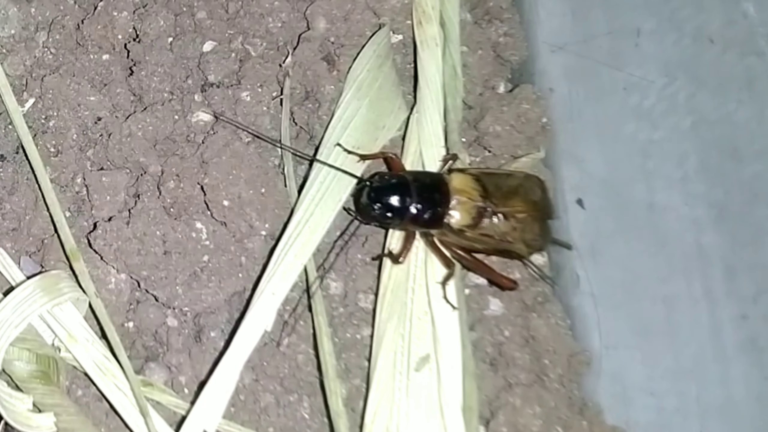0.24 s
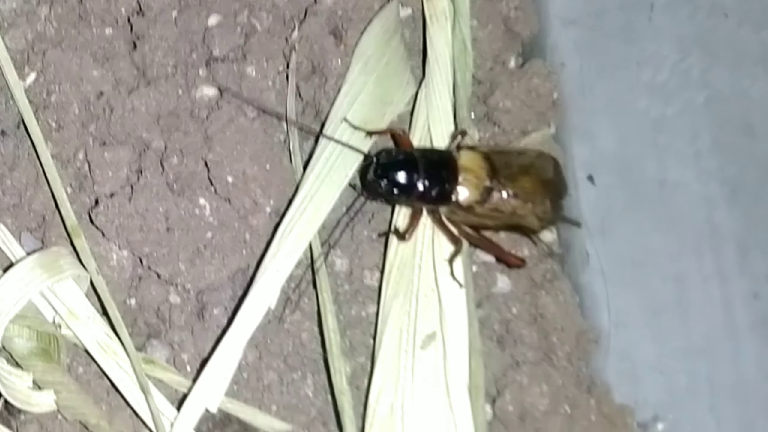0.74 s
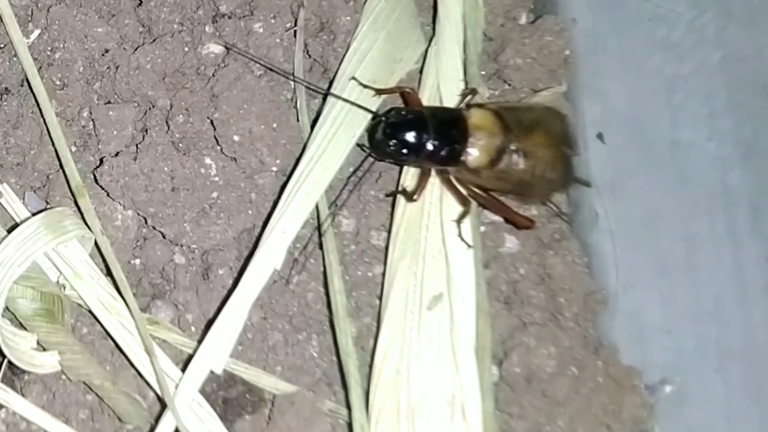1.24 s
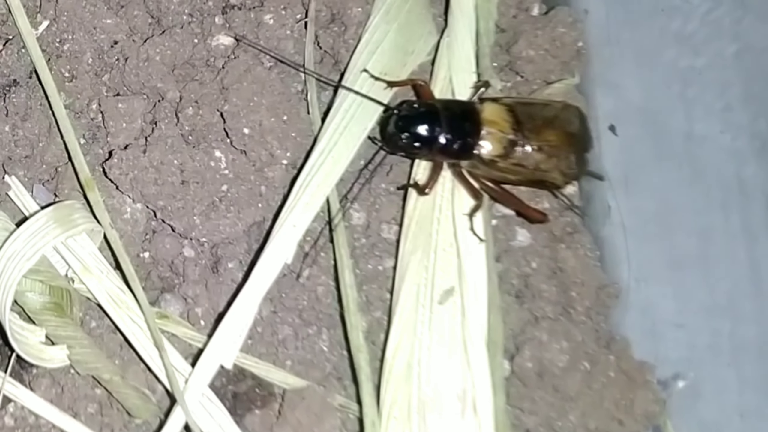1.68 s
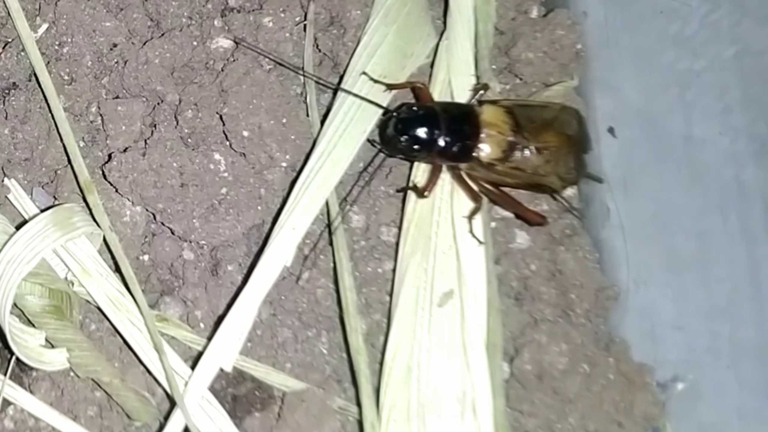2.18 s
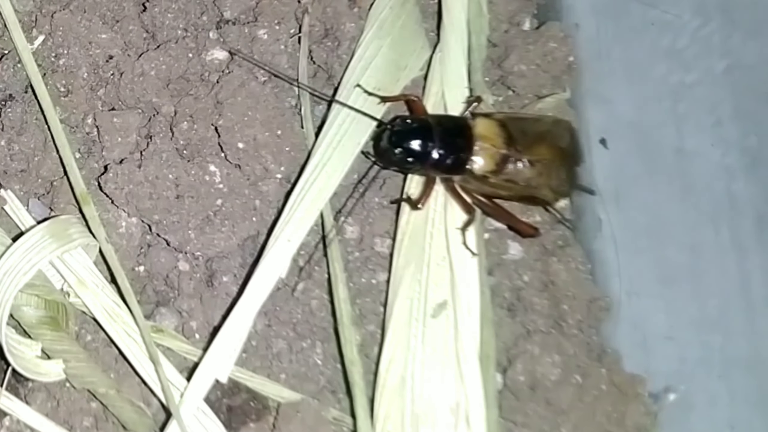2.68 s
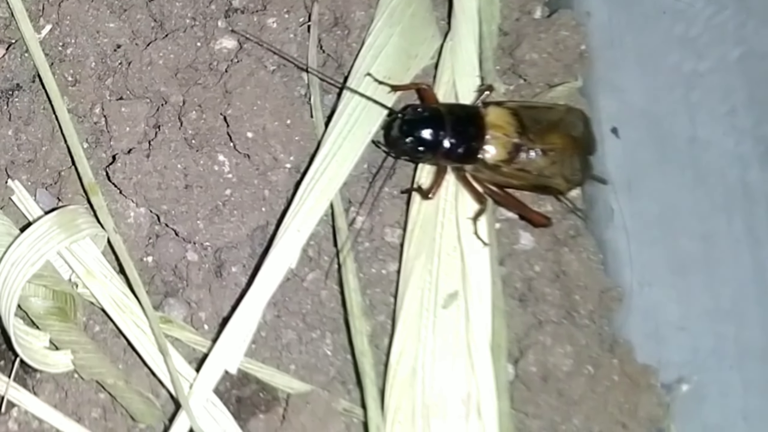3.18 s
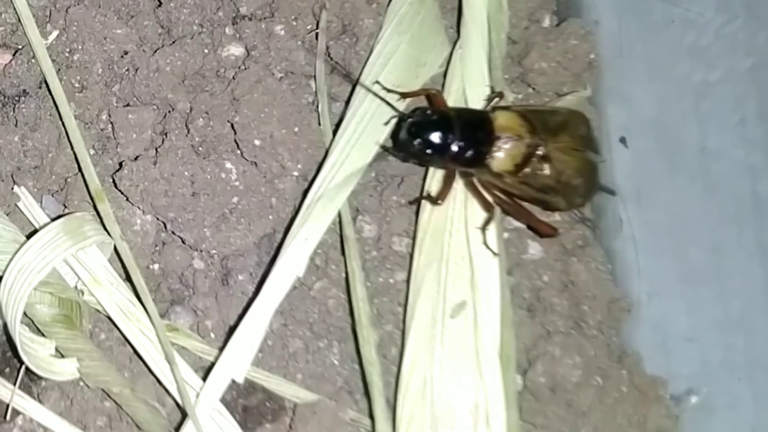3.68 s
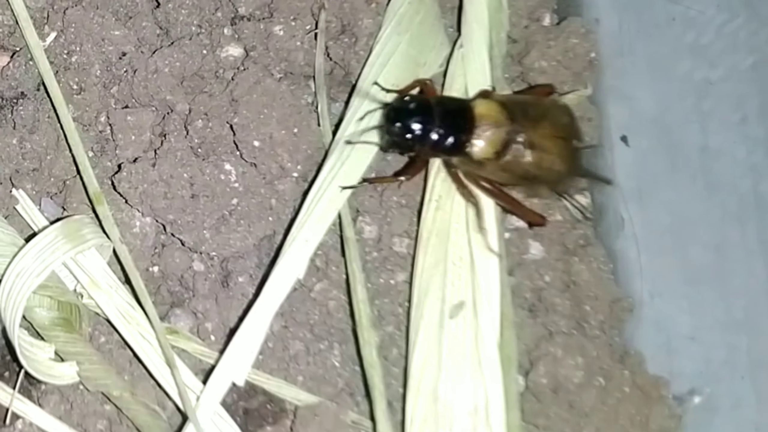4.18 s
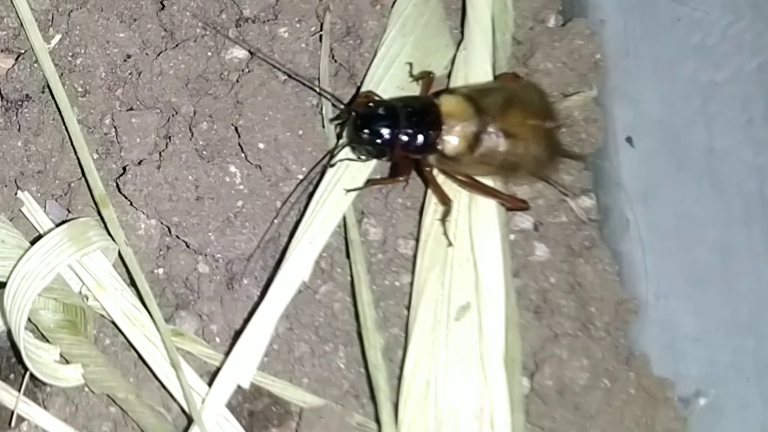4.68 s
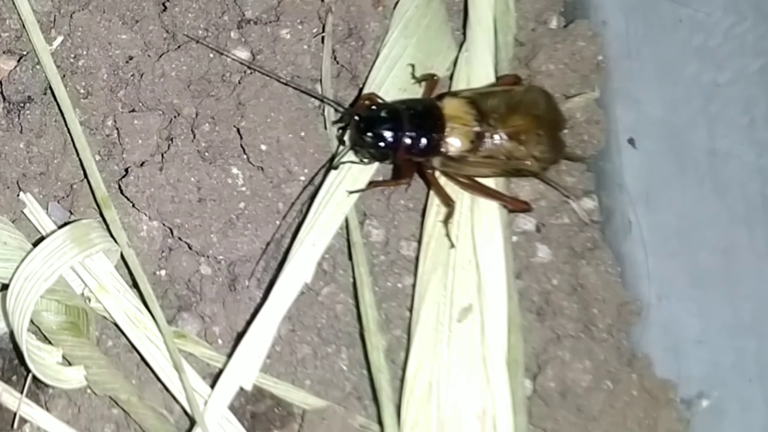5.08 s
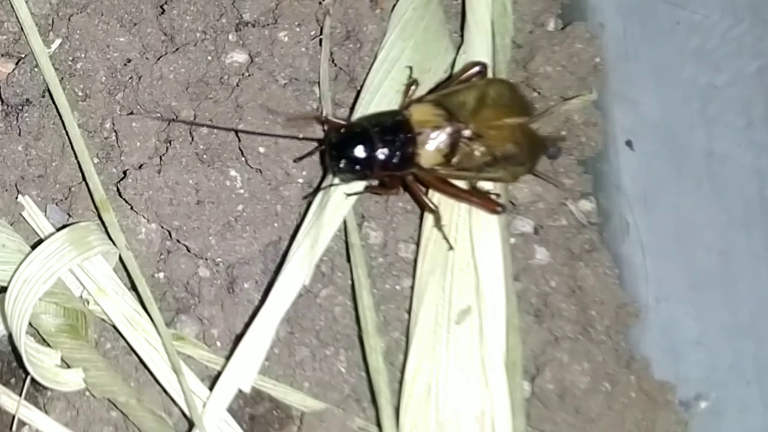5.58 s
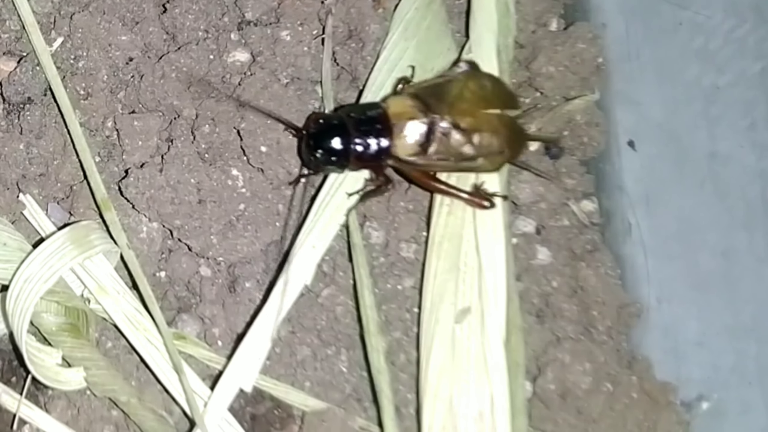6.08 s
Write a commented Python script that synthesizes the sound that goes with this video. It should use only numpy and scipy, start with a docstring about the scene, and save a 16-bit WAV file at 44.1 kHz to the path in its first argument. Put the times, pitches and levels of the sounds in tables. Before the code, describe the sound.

Outdoors at night by a wall, a phone very close to a cricket. At 0 s the ring of an earlier chirp fades, with a barely audible far-off hoot, perhaps a dog, at 0.06-0.25 s. A weaker two-pulse chirp at 0.12 s leads to loud shrill chirps at 0.36, 0.63, 0.98 and 1.31 s. Each is normally three 20 ms pulses, 30 ms apart, near 5.2 kHz and falling about 500 Hz, with overtones, rasp and a short outdoor echo. After a pause, chirping resumes at 2.0 s, every 0.2-0.35 s until the end; 4.23 s is a broken, squeaky pair, and 5.97 s has four pulses. Gritty scrapes and tiny skids fill gaps, with faint dull knocks near 0.74, 3.97 and 6.05 s and very faint hoarse distant calls at 0.6 and 4.6 s. The cricket moves left to right after 4 s. Soft low rumble, wavering hum and thin hiss persist.

```python
"""At night on bare soil by a wall, the echo of an earlier chirp fades under a faint, far-off hoot, perhaps a dog's bark.
A field cricket a hand's width from a phone then chirps to the end: each wing stroke drags a scraper over a file,
whose tooth strikes sound a falling 5 kHz tone with overtones and rasp, about three strokes a chirp, each echoed.
Between come gritty wing scrapes, squeaking skids, dull resonant knocks and a few hoarse far calls, mostly echo.
Late on, the cricket's image passes from left to right; filtered-noise rumble and air and a wavering hum last throughout."""
import sys
import numpy as np
from scipy import signal
from scipy.fft import rfft, irfft
from scipy.io import wavfile
from scipy.ndimage import map_coordinates

SR = 44100
rng = np.random.default_rng(int(sys.argv[2]) if len(sys.argv) > 2 else 0)


def log_audio(samples):
    """Write samples as a 16-bit WAV file to the path given in sys.argv[1]."""
    # one column per channel
    frames = np.atleast_2d(samples).T
    # limit to full scale, then quantise
    limited = np.clip(frames, -1, 1)
    pcm = np.round(limited * 32767).astype(np.int16)
    wavfile.write(sys.argv[1], SR, pcm)


N = 279594
TIME = np.arange(N) / SR
FREQ = np.maximum(np.fft.rfftfreq(N, 1 / SR), 1)

# Nominal chirps, before each stroke's own changes: (middle of first stroke [s], strokes [count],
# stroke period [s], stroke length [s], pitch fall [Hz], level [dB], rasp re level [dB],
# slip of first stroke [0-1], share lost from last stroke [0-1], opening scrape, relative level [dB])
CHIRPS = [(0.1211, 2, 0.031, 0.025, 540, -19, -18.5, 0.98, 0.13, -48),
          (.361, 3, 0.03, .021, 530, -17.3, -22.5, .6, 0.02, -59),
          (0.634, 3, 0.03, .018, 530, -17, -20, 0.01, 0.69, -68),
          (0.979, 3, 0.03, .02, 510, -16.5, -24.5, 0, 0.01, -42.5),
          (1.3078, 3, 0.031, .02, 486, -16.5, -25.5, 0.09, 0.41, -40),
          (2.0035, 3, 0.031, .018, 554, -17, -21, 0.63, 0.03, -46),
          (2.324, 3, 0.031, .017, 540, -16, -27, 0, 0.03, -40),
          (2.641, 3, 0.031, .019, 463, -16.2, -24.5, 0.1, 0.02, -44),
          (2.911, 3, 0.03, .0195, 500, -16.5, -22.5, 0.06, 0.02, -43),
          (3.287, 3, .03, .0185, 490, -16.5, -25, 0.03, 0.01, -41.5),
          (3.54, 3, 0.03, .018, 460, -16, -23.5, 0, 0.01, -42.5),
          (3.745, 3, 0.029, .0175, 504, -16.5, -21.5, 0.03, 0.01, -56),
          (4.019, 3, 0.029, .018, 510, -16, -21.5, 0.11, 0, -57),
          (4.225, 2, 0.03, 0.016, 348, -16.5, -19.5, 1, 0, -64),
          (4.4454, 3, 0.028, .018, 535, -16, -23, 0.98, 0, -46.5),
          (4.709, 3, 0.03, .0205, 474, -16.5, -24.5, 0, 0, -42),
          (4.9586, 3, 0.031, .02, 520, -16, -26, 0, 0.02, -41),
          (5.2139, 3, 0.03, .0205, 520, -15.9, -24, 0.01, 0.31, -40),
          (5.418, 3, 0.029, .017, 590, -15.5, -24, 0.03, 0, -55),
          (5.661, 3, 0.029, .018, 525, -15.5, -30.5, 0, .45, -54),
          (5.9712, 4, 0.03, .016, 563, -15, -21.5, 0.07, 0.13, -49)]
# Colour of the rasp: (frequency [Hz], relative level [dB])
RASP_COLOUR = [(1000, -28.5), (3600, -28), (4500, 4.5), (5600, 7), (6700, -4), (7400, -16), (8100, -14),
               (9200, -10.5), (10300, 8), (12200, -2.5), (13800, -1.5), (15300, -13), (16200, 10)]
# Skids and squeaks of the scraper: (time [s], length [s], centre [Hz], width [Hz], level [dB])
SKIDS = [(0.688, 0.007, 11200, 2400, -28), (4.225, 0.0046, 11200, 2500, -30),
         (4.277, 0.007, 11350, 1400, -27.5), (5.711, 0.0071, 11170, 2500, -29.5),
         (6.233, 0.0023, 12400, 4000, -37), (6.235, 0.0038, 14900, 2000, -30.5)]
# Light scrapes as the wings shift between chirps: (time [s], relative level [dB])
SHIFT_SCRAPES = [(0.315, -46.5), (0.604, -43.5), (0.832, -41.5), (1.874, -41), (1.911, -51.5), (1.939, -49),
                 (3.979, -48.5), (4.347, -44.5), (5.316, -42), (5.538, -46), (5.628, -38.5), (5.927, -41),
                 (6.113, -42), (6.208, -43), (6.292, -45)]
# Colour of a slack wing lightly scraped: (frequency [Hz], relative level [dB])
SLACK_WING_COLOUR = [(1200, -40), (2400, -15.5), (3700, -15.5), (4200, -11), (4600, 8.5), (5100, 0),
                     (6600, -19), (7800, -30), (10000, -45)]
# Place of the cricket between the microphones: (time [s], left minus right [dB])
CRICKET_PAN = [(0, 3.2), (3.7, 3.3), (4.7, 1.5), (5.3, .4), (5.7, -2.5), (6.3, -3.5)]
# Nearby surfaces as each microphone hears them: (delay [ms], level re direct sound [dB])
NEAR_LEFT = [(1.949, -13), (4.45, -6)]
NEAR_RIGHT = [(2.62, -21.5), (4.904, -15)]
# A faint, far-off hoot, perhaps a dog's bark, one row: (time [s], length [s], relative level [dB])
FAR_HOOT = (0.058, 0.19, -59.5)
# Soft knocks near the phone: (time [s], relative level [dB])
KNOCKS = [(0.741, -40), (3.973, -41.5), (6.050, -46)]
# Brief far-off calls: (time [s], length [s], pitch [Hz], relative level [dB])
FAR_CALLS = [(.585, 0.032, 1346, -66), (4.611, 0.08, 1533, -69)]
# Colour of the night rumble: (frequency [Hz], relative level [dB])
RUMBLE_COLOUR = [(20, -54.5), (31, -16.5), (42, -3), (75, 1), (170, 0.5), (225, -11.5), (310, -11.5),
                 (420, -24.5), (760, -27), (1400, -32), (2200, -31), (3300, -34), (4500, -39),
                 (7000, -94.5)]
# Stereo width of the rumble: (frequency [Hz], side minus mid [dB])
RUMBLE_SIDE = [(40, -14), (70, -13), (130, -15), (260, -12), (500, -4), (1000, 0), (16000, 1)]
# Hum partials, before they waver: (frequency [Hz], level [dB])
HUM = [(71, -57), (197, -59), (300, -69)]
# Colour of the air's thin hiss: (frequency [Hz], relative level [dB])
AIR_COLOUR = [(1000, -19.0), (3500, -3.0), (5000, 6.5), (7500, -11.0), (11000, 6), (15500, -22.0)]
# Swell and ebb of the background: (time [s], level change [dB])
NIGHT_LEVEL = [(0, -0.5), (.7, -1), (1.7, 0.7), (2.7, -2.5), (3.7, -2), (5.2, -3), (6.3, 0)]

STROKE_HZ = 5167.3  # nominal tooth rate at mid-stroke
SLOWING_S = 0.00066  # each stroke period is this much longer than the one before
SETTLE_STROKES = 0.91  # the wings settle into their stroke over about this many strokes
OPENING_LEAD_S = 0.01262  # the wings scrape open this long before a chirp
TURN_OVERTONE_DB = 0.26  # overtones gained per dB of pan as the cricket turns its wings to the right
TOP_HZ = 16000  # upper limit of the phone


def undb(db):
    """Convert a level in decibels to an amplitude ratio."""
    return 10 ** (np.asarray(db) / 20)


def unit(x):
    """Normalize to a root-mean-square value of 1."""
    return x / np.sqrt(np.mean(x ** 2))


def gains(points):
    """Frequency response: (Hz, dB) points interpolated in log frequency."""
    hz, db = np.transpose(points)
    return undb(np.interp(np.log(FREQ), np.log(hz), db))


def noise(gain):
    """Spectral filtering: white noise given a frequency response, at rms 1."""
    return unit(irfft(rfft(rng.standard_normal(N)) * gain, N))


def shaped(x, gain):
    """Power-preserving filtering: colour a white excitation by a normalized response."""
    return irfft(rfft(x) * unit(gain), N)


def resonance(hz, width_hz):
    """Resonance: a steep response peak about a natural frequency."""
    return 1 / (1 + ((FREQ ** 2 - hz ** 2) / (FREQ * width_hz * 2)) ** 2 * 2)


def walk(rate):
    """Band-limited fluctuation: smooth random motion of spread 1, up to about rate in Hz."""
    return noise(np.exp(-(FREQ / rate) ** 2))


def add(track, start, sound):
    """Superposition: mix a sound into a track at a time."""
    i = int(start * SR)
    track[i:i + len(sound)] += sound[:max(N - i, 0)]


def swell(start, length, rise, fall):
    """Rounded envelope, rms 1 over its span; rise and fall are shares of its length."""
    u = np.linspace(0, 1, int(length * SR))
    onset = np.sin(np.pi / 2 * np.minimum(u / rise, 1))
    release = np.sin(np.pi / 2 * np.minimum((1 - u) / fall, 1)) ** 2
    out = np.zeros(N)
    add(out, start, unit(onset * release))
    return out


def burst(start, decay, attack=0.00038):
    """Transient envelope: quick rise and exponential fall, time constants in s."""
    t = np.arange(SR // 10) / SR
    out = np.zeros(N)
    add(out, start, (1 - np.exp(-t / attack)) * np.exp(-t / decay))
    return out


def wing_strokes(first_shorter=0.16, first_steeper=0.37, first_db=-1.0, octave_db=-17.5,
                 first_octave_db=5.5, first_rasp_db=5.0, slip_shorter=0.23, slip_hz=130,
                 slip_db=-9.0, slip_rasp_db=9., cut_hz=260, cut_db=-3., cut_octave_db=14.,
                 cut_rasp_db=15.5, catch_rise=0.0288, first_rise=0.285):
    """Stroke kinematics: the wings settle through a chirp, and a slip or early break alters pitch and loss.

    Rows: (start s, length s, pitch Hz, fall Hz, level dB, octave dB, rasp dB, rasp rise as share of length)."""
    rows = []
    for middle, count, period, full_length, fall_hz, db, rasp_db, first_slip, last_cut, _ in CHIRPS:
        for k in range(round(count)):
            # a fresh stroke is short, steep and bright; a slipping one weak and raspy; a cut one breaks off early
            fresh = np.exp(-k / SETTLE_STROKES)
            slip = first_slip * (k == 0)
            cut = min(last_cut, .8) * (k == round(count) - 1)
            length = full_length * (1 - first_shorter * fresh) * (1 - slip_shorter * slip)
            start = middle + k * period + SLOWING_S * k * (k - 1) / 2 - length / 2
            pitch_hz = STROKE_HZ - slip_hz * slip - cut_hz * cut
            stroke_fall_hz = fall_hz * (1 + first_steeper * fresh) * (1 - cut)
            level = db + first_db * fresh + slip_db * slip + cut_db * cut
            octave = octave_db + first_octave_db * fresh + cut_octave_db * cut
            rasp = rasp_db + first_rasp_db * fresh + slip_rasp_db * slip + cut_rasp_db * cut
            # the first stroke glides in cleanly unless it slips; later ones catch the file with a scratch
            rasp_rise = catch_rise + first_rise * (k == 0) * abs(1 - slip)
            rows.append((start, length * (1 - cut), pitch_hz, stroke_fall_hz, level, octave, rasp, rasp_rise))
    return rows


def strokes(bend=0.041, jitter=0.0071, rise=0.45, fall=0.34, third_db=-33.0, least_rasp_db=-42.0,
            flutter_db=-1.5, grain_db=5.5, overtone_swell=0.27, rattle=.06, scatter_hz=15, scatter_db=1.):
    """Stridulation: tooth strikes ring the wings, and the slowing wing lowers the pitch; tone, overtones, rasp."""
    tone, overtones, rasp_level = np.zeros((3, N))
    wander, flutter, wobble = walk(380), undb(flutter_db * walk(350)), walk(270)
    rows = wing_strokes()
    for row, (chance, detune, grit) in zip(rows, rng.standard_normal((len(rows), 3))):
        start, length, hz, fall_hz, db, octave, rasp, rasp_rise = row
        first = int(start * SR)
        span = slice(first, first + int(length * SR))
        pressure = swell(start, length, rise * np.exp(0.17 * chance), fall)[span]
        u = np.linspace(-.5, .5, len(pressure))
        # the fall is steepest at first and levels off towards the wing's own resonance
        curve = 1 + bend * (u ** 2 - np.var(u) / 2) + jitter * wander[span]
        tooth_rate = hz * curve - fall_hz * u + scatter_hz * detune
        phase = 2 * np.pi * np.cumsum(tooth_rate) / SR
        tone[span] += undb(db) * pressure * np.sin(phase)
        # overtones follow the bite of the teeth: they start sooner and are less even than the fundamental
        bite = undb(db) * np.abs(pressure) ** overtone_swell * flutter[span]
        second = undb(octave) * np.sin(2 * phase + rattle * wobble[span])
        third = undb(third_db) * np.sin(3 * phase + wobble[span])
        overtones[span] += bite * (second + third)
        # even the smoothest stroke rasps a little
        roughness = np.hypot(undb(rasp + scatter_db * grit), undb(least_rasp_db))
        rasp_level += swell(start, length + 0.0028, rasp_rise, 0.46) * undb(db) * roughness
    grains = undb(grain_db * walk(200)) * rng.standard_normal(N)
    return tone, overtones, shaped(rasp_level * grains, gains(RASP_COLOUR))


def skids(rasp_db=-2.5):
    """Modal excitation: irregular tooth strikes excite the high wing modes instead of the main one."""
    rasp = undb(rasp_db) * noise(gains(RASP_COLOUR))
    out = 0
    for start, length, hz, width, db in SKIDS:
        contact = swell(start, length, .3, .6)
        squeak = noise(resonance(hz, width / 2))
        out = out + contact * undb(db) * (squeak + rasp)
    return out


def scrapes(attack=0.0029, decay=0.0045, grain_db=6.0, strength_db=7.0,
            opening_rasp_db=-2.0, shift_rasp_db=-2.0):
    """Friction: light, gritty contact rings the slack wing lower and rasps, before chirps and on wing shifts."""
    opening = sum(undb(db) * burst(middle - length / 2 - OPENING_LEAD_S, decay, attack)
                  for middle, _, _, length, *_, db in CHIRPS)
    shifting = sum(undb(db) * burst(s, decay, attack) for s, db in SHIFT_SCRAPES)
    grit = undb(strength_db + grain_db * walk(470)) * rng.standard_normal((2, N))
    rasp_level = undb(opening_rasp_db) * opening + undb(shift_rasp_db) * shifting
    ring = shaped(grit[0] * (opening + shifting), gains(SLACK_WING_COLOUR))
    return ring + shaped(grit[1] * rasp_level, gains(RASP_COLOUR))


def nearby(x, surfaces):
    """Interference: short echoes from ground and wall ripple each falling stroke."""
    echoes = sum(undb(db) * np.exp(-2j * np.pi * FREQ * ms / 10 ** 3) for ms, db in surfaces)
    return irfft(rfft(x) * (1 + echoes), N)


def yard(x, t60=.72, tail_db=-17., early_t60=0.074, early_db=-19.,
         echo_s=0.039, echo_db=-21., patchy_db=2.5):
    """Reverberation: scatter from the soil, one echo off a far wall and a diffuse tail (t60 in s)."""
    t = np.arange(SR) / SR
    fade_in = 1 - np.exp(-t / 0.008)
    out = []
    for late, early in rng.standard_normal((2, 2, SR)):
        late = late * undb(patchy_db * walk(150)[:SR])  # outdoors the reflections arrive in clumps
        response = np.zeros(SR)
        for scatter, decay, db in ((late, t60, tail_db), (early, early_t60, early_db)):
            response += undb(db) * unit(scatter * fade_in * undb(-60 * t / decay)) / np.sqrt(SR)
        response[int(echo_s * SR)] += undb(echo_db)
        out.append(signal.fftconvolve(x, response)[:N])
    return np.array(out)


def earlier_chirp(hz=5130, width_hz=140, db=-39.0, octave_db=-12.5, t60=0.29):
    """Exponential decay: the echo of a chirp from a moment before still hangs in the yard."""
    ring = [noise(resonance(hz, width_hz)) + undb(octave_db) * noise(resonance(2 * hz, 2 * width_hz))
            for _ in range(2)]
    return np.array(ring) * undb(db - 60 * TIME / t60)


def knocks(hz=480, width_hz=150, decay=0.0023, thump_hz=210):
    """Impact: quickly decaying bursts of a dull resonance with a low thump."""
    ring = noise(resonance(hz, width_hz)) + noise(resonance(thump_hz, 100.2))
    return ring * sum(undb(db) * burst(s, decay) for s, db in KNOCKS)


def far_hoot(upper_hz=490, upper_width_hz=90, low_hz=270, low_db=0., breath_hz=1700, breath_db=-7.5):
    """Resonance: a brief hollow hoot of two low resonances with a little breath."""
    start, length, db = FAR_HOOT
    upper = noise(resonance(upper_hz, upper_width_hz))
    low = undb(low_db) * noise(resonance(low_hz, 58))
    breath = undb(breath_db) * noise(resonance(breath_hz, 1300))
    return undb(db) * swell(start, length, 0.28, 1.0) * (upper + low + breath)


def far_calls(hoarse_db=1.5):
    """Distance: hoarse calls, a wavering tone in resonant noise, reach the ear mostly as echo."""
    waver = 0.37 * walk(62)  # phase, rad
    calls = 0
    for start, length, hz, db in FAR_CALLS:
        tone = np.sqrt(2) * np.sin(2 * np.pi * hz * TIME + waver)
        breath = undb(hoarse_db) * noise(resonance(1.1 * hz, 580))
        calls = calls + undb(db) * swell(start, length, 0.14, 0.24) * (tone + breath)
    return calls + yard(calls, t60=.7, tail_db=-3., early_db=3., echo_db=-18.)


def town_rumble(level_db=-48.0, swell_db=0.85):
    """Long-wave coherence: low town noise is nearly alike in both ears, with a small side part."""
    mid = gains(RUMBLE_COLOUR)
    side = mid * gains(RUMBLE_SIDE)
    share = np.sqrt(np.sum(side ** 2) / np.sum(mid ** 2))
    stereo = noise(mid) + share * noise(side) * np.array([[1], [-1]])
    return stereo * undb(level_db + swell_db * walk(5.7))


def steady_hum():
    """Superposed sinusoids: each low partial wavers slowly in level and phase."""
    return sum(undb(db + 2 * walk(16.0)) * np.sqrt(2) * np.sin(2 * np.pi * hz * TIME + 0.75 * walk(2.2))
               for hz, db in HUM)


def night(air_db=-71.5, rustle_hz=2300, rustle_db=-75.0):
    """Ambient noise: rumble and hum share a slow swell with a faint rustle, over an even thin hiss."""
    gust = .9 * walk(4)  # dB
    rustle_noise = np.array([noise(resonance(rustle_hz, 400)) for _ in range(2)])
    rustle = undb(rustle_db + 2 * gust) * rustle_noise
    air_gain = gains(AIR_COLOUR)
    air = undb(air_db) * np.array([noise(air_gain), noise(air_gain)])
    background = (town_rumble() + steady_hum()) * undb(gust) + rustle + air
    return background * undb(np.interp(TIME, *np.transpose(NIGHT_LEVEL)))


def scene(overtone_pan_db=-16.0, rasp_pan_db=-0.5, lag_per_pan=0.4):
    """Directivity and superposition: the wings beam overtones to the right; echoes and night are added."""
    tone, overtones, rasp = strokes()
    low = tone + scrapes()
    rasp = rasp + skids()
    pan = np.interp(TIME, *np.transpose(CRICKET_PAN))
    overtones = overtones * undb(TURN_OVERTONE_DB * (pan.mean() - pan))
    direct = []
    for side, surfaces in ((0.89, NEAR_LEFT), (-0.43, NEAR_RIGHT)):
        heard = low * undb(side * pan / 2)
        heard = heard + overtones * undb(side * (0.9 * pan + overtone_pan_db) / 2)
        heard = heard + rasp * undb(side * rasp_pan_db / 2)
        # the nearer microphone hears it a fraction of a sample sooner
        heard = map_coordinates(heard, [np.arange(N) + side * lag_per_pan * pan / 2], order=5)
        direct.append(nearby(heard, surfaces))
    # short waves scatter more from the clods and die sooner in the air
    low_echo = yard(low, t60=0.51, tail_db=-16.5, early_db=-19.5, echo_db=-22.0)
    high_echo = yard(overtones + rasp, t60=0.45, tail_db=-13.0, early_t60=0.019, early_db=0.5, echo_db=-27.0)
    cricket = np.array(direct) + low_echo + high_echo + earlier_chirp()
    return cricket + knocks() + far_hoot() + far_calls() + night()


def record(dry):
    """Band limiting: the phone cuts the top with a steep elliptic low-pass."""
    return signal.sosfilt(signal.ellip(10, .2, 70, TOP_HZ, fs=SR, output="sos"), dry)


dry = scene()
out = record(dry)
log_audio(out)
```